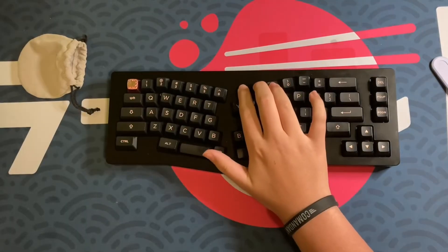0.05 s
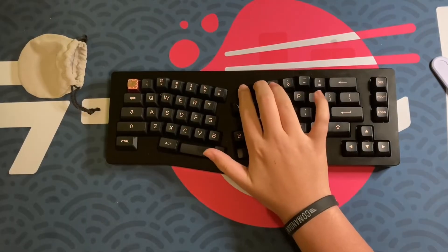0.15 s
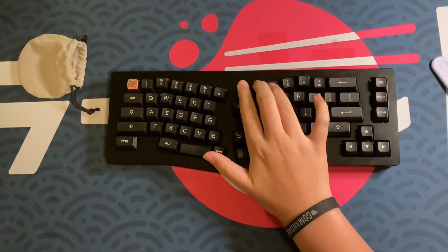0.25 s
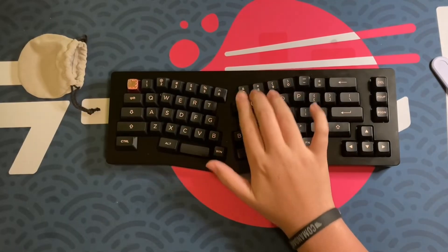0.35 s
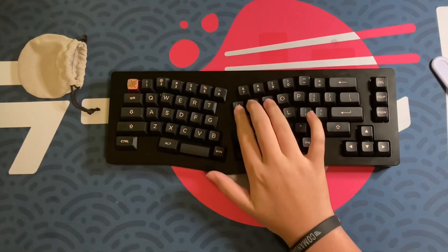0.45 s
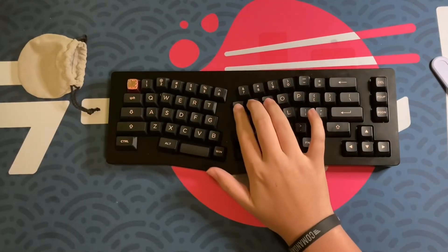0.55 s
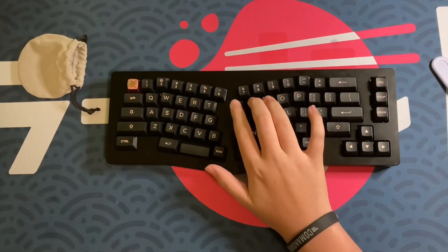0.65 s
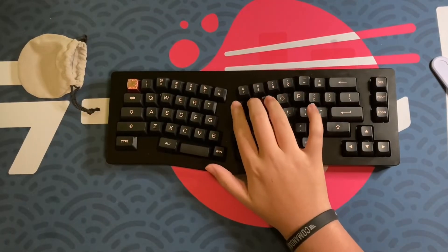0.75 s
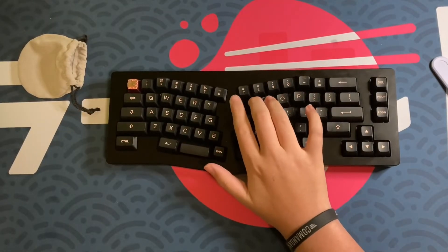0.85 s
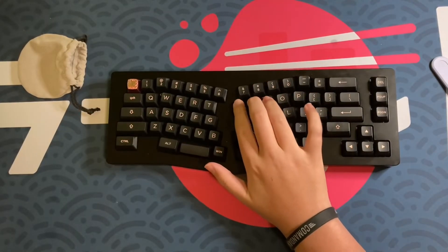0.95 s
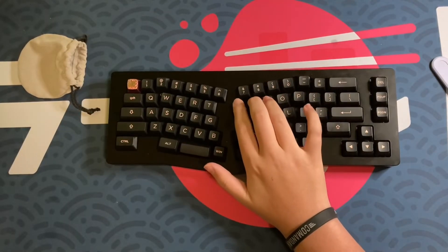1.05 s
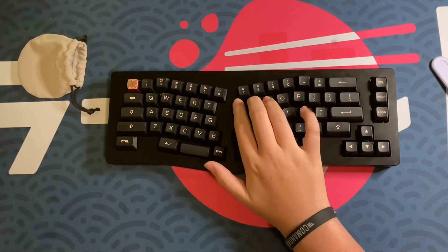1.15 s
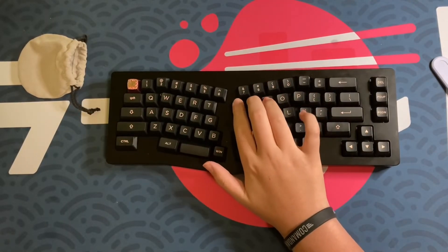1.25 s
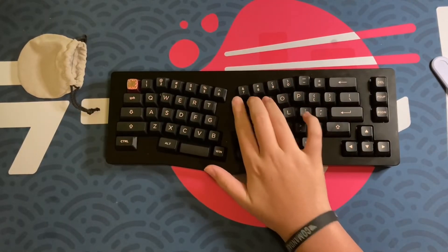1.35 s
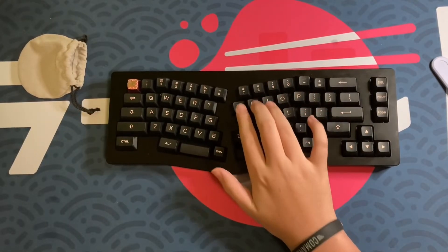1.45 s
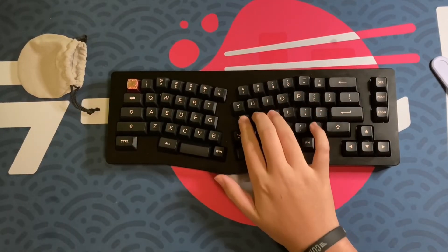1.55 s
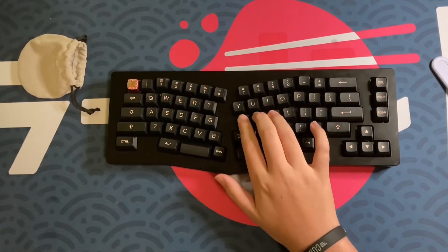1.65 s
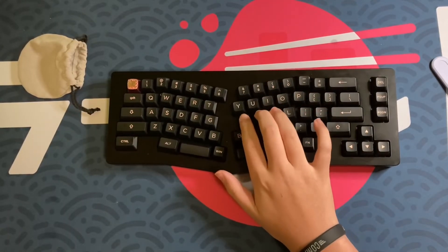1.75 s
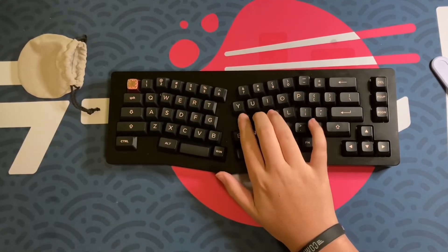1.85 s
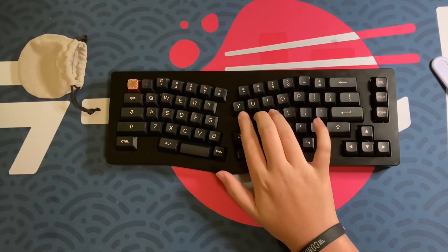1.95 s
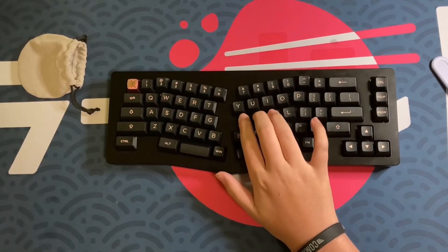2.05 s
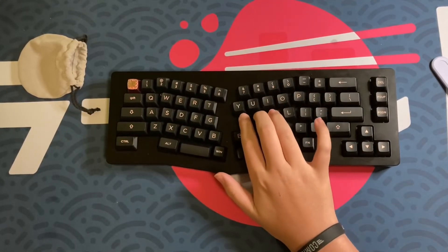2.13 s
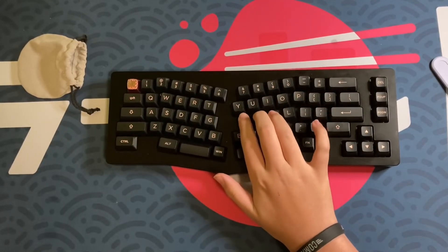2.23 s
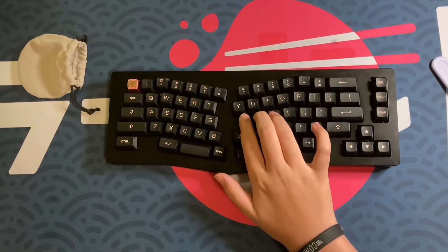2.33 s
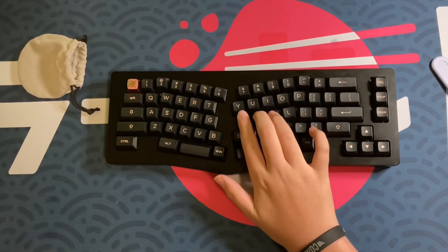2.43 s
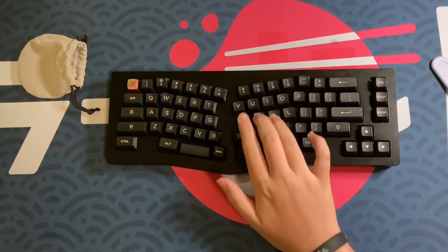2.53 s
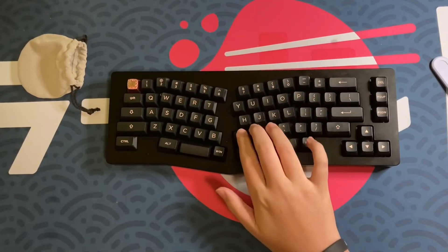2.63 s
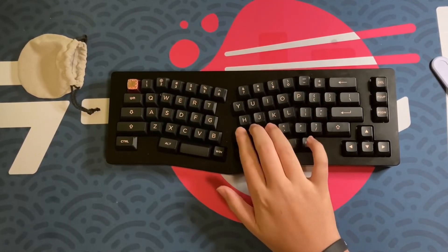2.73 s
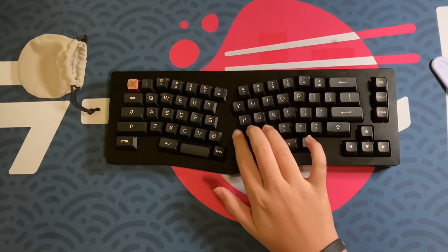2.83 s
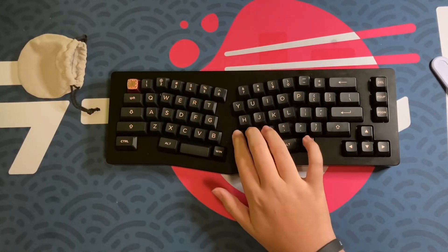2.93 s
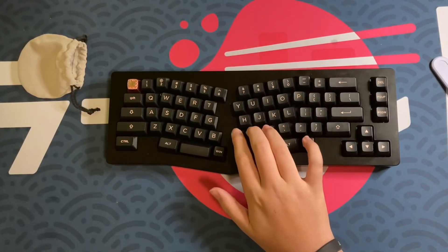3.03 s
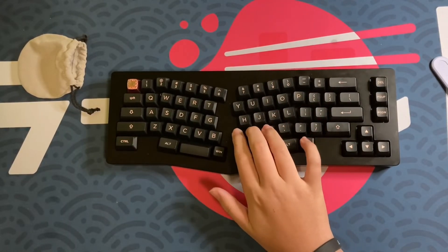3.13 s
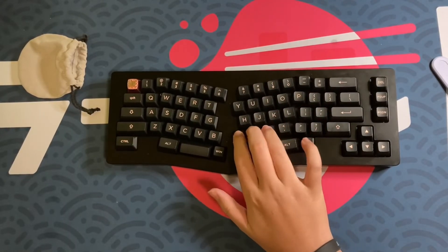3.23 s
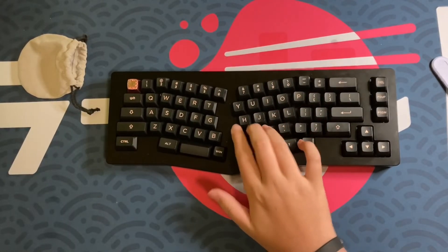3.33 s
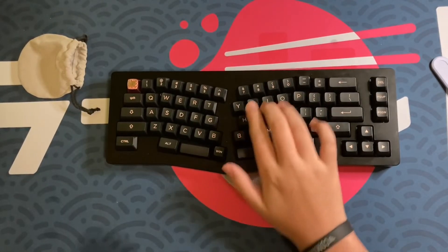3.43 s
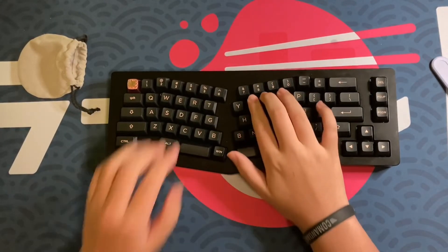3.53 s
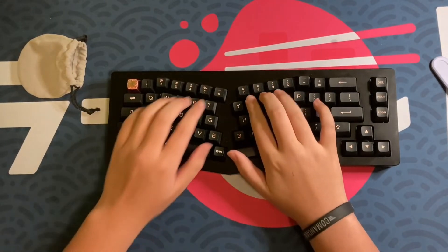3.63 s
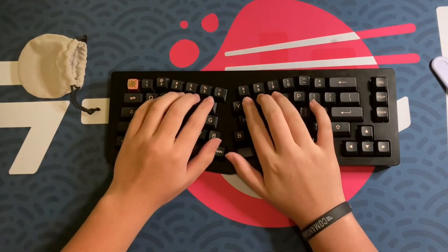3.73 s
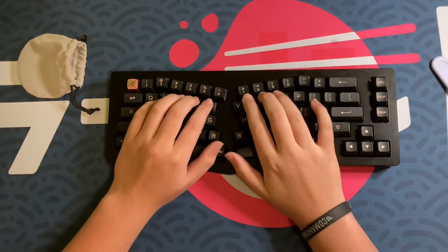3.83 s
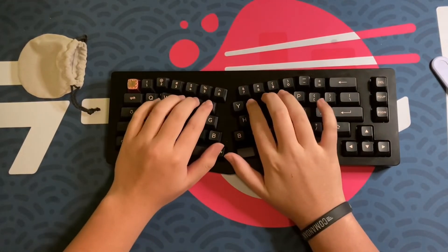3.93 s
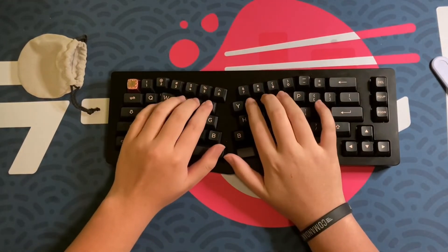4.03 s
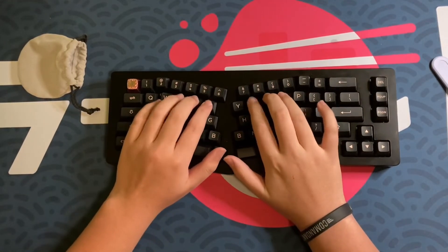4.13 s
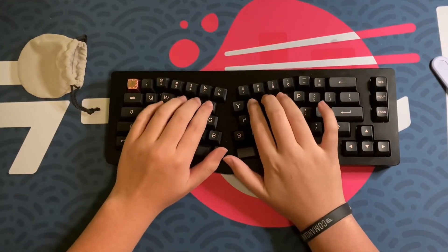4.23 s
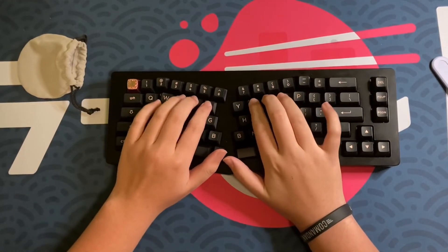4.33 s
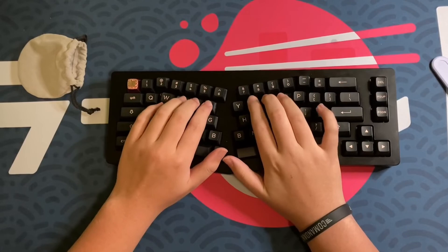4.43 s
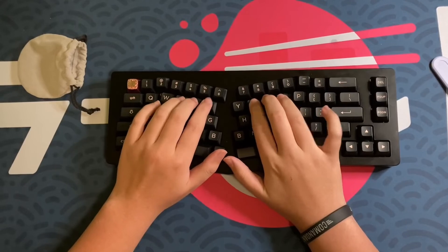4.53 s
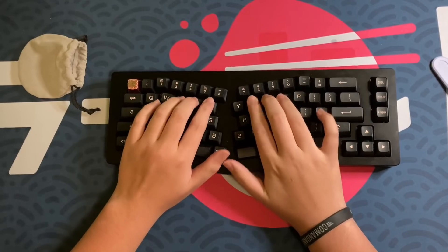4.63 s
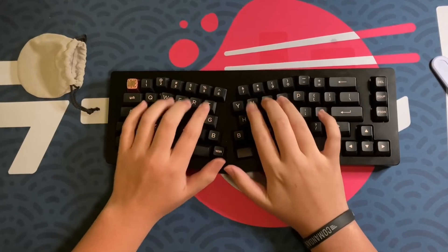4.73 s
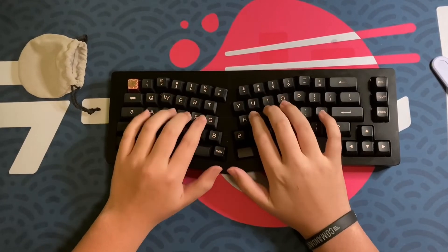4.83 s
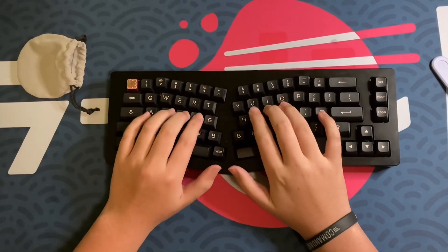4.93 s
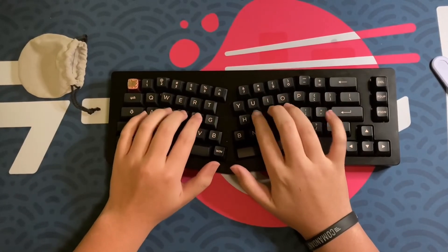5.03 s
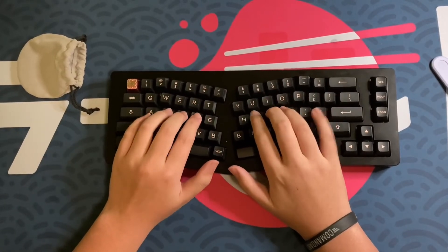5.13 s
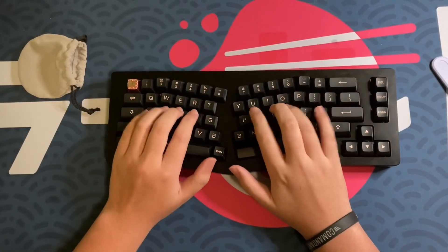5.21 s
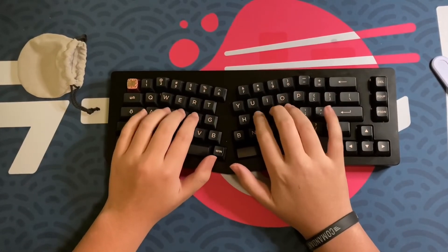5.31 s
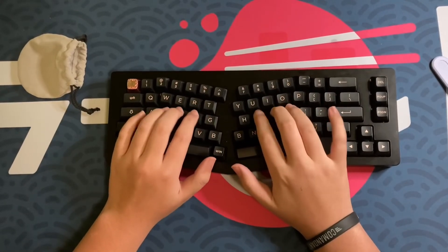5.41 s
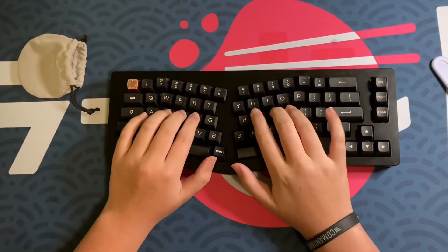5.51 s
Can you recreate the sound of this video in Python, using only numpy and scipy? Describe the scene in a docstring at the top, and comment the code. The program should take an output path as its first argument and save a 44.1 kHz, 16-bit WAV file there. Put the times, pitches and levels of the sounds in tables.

```python
"""Fast typing on a heavy mechanical keyboard on a desk mat, in short bursts with pauses.
Each press or release is a hard plastic contact: shaped noise with a tick, a keycap clack, a plate thock and chatter.
Case and desk ring as fading sines, near surfaces return delayed copies, and a small room answers as fading noise.
Sliding skin is a grainy hiss and nudges a few keycaps; low rumble and a faint rush of air lie underneath.
A stereo microphone stands close by."""
import sys
import numpy as np
from scipy import signal
from scipy.fft import rfft, irfft, next_fast_len
from scipy.io import wavfile
from scipy.ndimage import uniform_filter1d, map_coordinates

SR = 44100
rng = np.random.default_rng(int(sys.argv[2]) if len(sys.argv) > 2 else 0)


def int16_out(signal):
    """Quantize to a 16-bit WAV file."""
    q = np.round(np.clip(np.atleast_2d(signal).T, -1, 1) * 32767)
    wavfile.write(sys.argv[1], SR, q.astype(np.int16))


N = 245627  # samples in the scene

# Key contacts, presses and releases alike: [t/s, clack energy level/dB, extra tick level/dB]
KEY_CONTACTS = [(0.0001, -18, 3), (0.0732, -26, 3.0), (0.0809, -26.5, 7), (0.1315, -14.0, -1),
                (0.1752, -15.0, 4.5), (0.216, -20, 4.5), (0.2657, -21.5, 11), (0.698, -14.5, -7),
                (0.7305, -18, -5), (0.7697, -11, -2), (0.7848, -14.5, 7), (0.8499, -14, 3.5),
                (0.91, -13.5, -4), (0.957, -17.5, -3.0), (0.9749, -12.5, 1.5), (1.0001, -14, 6),
                (1.0931, -11, -1.5), (1.1311, -9, 3), (1.17, -20.5, -2.0), (1.2111, -14, 7),
                (1.2608, -10.5, -1.5), (1.2803, -12, -6), (1.284, -7.5, 4), (1.3377, -15.5, 7.5),
                (1.3826, -15, 8.5), (1.79, -13.5, -1.5), (1.8249, -12.5, -3.5), (1.8606, -17, 8.5),
                (1.923, -18, 5), (2.006, -22, -6), (2.0325, -17, -4), (2.0469, -25, 6.0),
                (2.107, -20.0, 2.5), (2.2087, -21.5, -10), (2.2131, -18, 2.5), (2.2827, -20.0, 3.5),
                (2.3311, -6.5, -1.0), (2.3726, -19, -10.0), (2.383, -12.5, 7), (2.4263, -15, 8),
                (2.4705, -18.5, 10.0), (2.4853, -15.5, 9.5), (2.6893, -25, -24), (2.8458, -14, -5),
                (2.9033, -14.5, 3), (2.924, -15, 4), (2.9603, -18.5, -2), (3.0164, -17.5, -2),
                (3.0985, -6.5, 4.0), (3.1776, -15, 10.5), (3.2248, -9.5, 5), (3.2593, -9, 6.5),
                (3.319, -11.5, 9), (3.3304, -6.5, 13), (3.3499, -9, 3.5), (3.7313, -28.5, -27),
                (3.9196, -5.5, 0), (3.9409, -8.0, 0), (3.9667, -11, -3), (3.9852, -11, -2),
                (3.9994, -11.0, 3), (4.0392, -11.5, 5), (4.0934, -16.5, 6), (4.1025, -19.5, 6),
                (4.1459, -5.5, 1.5), (4.1602, -9.5, -2), (4.1817, -8, 0), (4.192, -10, -15),
                (4.2131, -11, 4), (4.2233, -9.5, 2.5), (4.248, -11.5, 2.0), (4.285, -17, -3),
                (4.3, -16, -6), (4.3339, -8, -1), (4.3616, -15, 2.0), (4.3824, -2, -8), (4.393, -7, 5.5),
                (4.4204, -13, 3), (4.4652, -18, -2.0), (4.4712, -18, 5), (4.5086, -10, -5),
                (4.549, -5.5, -1), (4.5562, -7, 5.5), (4.579, -12.5, -2.0), (4.6162, -16, 5.5),
                (4.6355, -14, 0), (4.6495, -12, -8.5), (5.038, -2.5, 3.5), (5.0541, -10.5, -7),
                (5.0615, -18, 15.5), (5.1292, -13, 8.5), (5.1354, -11.5, 9.5), (5.1721, -17.5, 12.5),
                (5.1853, -16.5, 7), (5.2502, -9, 3), (5.2564, -12.5, -2), (5.274, -11, 2),
                (5.2954, -11.0, 0), (5.3345, -8, 10.0), (5.358, -8.5, 2.0), (5.4283, -9.0, 6),
                (5.4552, -14.5, -1.0), (5.466, -10.0, 1), (5.4843, -15.5, 12.5), (5.4918, -13, 10),
                (5.5463, -8, 3.0), (5.5533, -19.5, 10.5)]
# Bursts of typing, each on its own patch of keys:
# [start t/s, keycap pitch f/Hz, keycap resonance level/dB, extra thock level/dB]
TYPING_BURSTS = [(0, 2070, -0.5, 2), (.5, 2110, 6, 2), (1.6, 2360, 1, 4.5), (2.6, 1680, 8, 3.5),
                 (3.8, 2060, 5.5, 0.4), (4.9, 2700, 5.5, 4)]
# Colour of a contact heard through cap, plate and case: [f/Hz, relative level/dB]
BOARD_COLOUR = [(80, -35), (280, -26), (480, -15.5), (720, -12.5), (880, -10), (1100, -1), (1370, -10.5),
                (1700, 1), (2300, -2), (2850, -5.5), (3500, -15.5), (5000, -18), (7000, -28),
                (11500, -26.5), (15500, -39.5)]
# Ringing tones of case and desk: [f/Hz, relative level/dB]
CASE_MODES = [(615, 10), (820, -19), (1045, -36), (1152, -2), (1245, 23), (1397, 17.5), (1612, 17.5),
              (1762, -29), (1882, -26), (2021, -17), (2120, 12), (2241, 28), (2607, -27), (2736, -34),
              (2829, -23), (2993, -20), (3430, -1)]
# Hard surfaces nearby: [delay to the left t/s, delay to the right t/s, level/dB]
NEAR_ECHOES = [(.00175, 0.001318, -9), (.0083, .0085, -16)]
# Time the room's answer takes to fall by 60 dB: [f/Hz, t/s]
ROOM_DECAY = [(300, 0.26), (800, 0.25), (2100, 0.24), (5500, 0.14), (12000, 0.24)]
# Colour of the room's answer: [f/Hz, relative level/dB]
WALL_COLOUR = [(200, 3), (700, 2.5), (2000, 0.5), (4500, 5.5), (6000, -5), (9000, 2.5), (11000, -16.5),
               (15000, -21)]
# How far the left capsule leads for sound from the keys: [f/Hz, phase/radians]
LEFT_LEAD = [(0, 0), (1100, 0), (2200, .45), (3200, .6), (5200, 3.1), (8000, 6), (11700, 9.4),
             (16000, 13.3)]
# Slides of a hand over mat and caps: [start t/s, length t/s, level/dB before fading and grain]
HAND_SLIDES = [(3.508, 0.13, -62.5), (3.674, 0.016, -58.5), (4.67, 0.14, -65.5)]
# Colour of the hiss of sliding skin: [f/Hz, relative level/dB per Hz]
SKIN_COLOUR = [(300, -6), (1200, 1), (2400, -1), (4000, -5), (6000, -9), (9000, -9), (11000, -16),
               (15000, -9)]
# Colour of the rush of air in the room: [f/Hz, relative level/dB per Hz]
AIR_COLOUR = [(200, -2), (450, -4), (750, 0), (1100, 0), (1600, -3), (2300, -9), (3400, -7), (5000, -20),
              (7000, -27), (9000, -30), (10800, -41), (13000, -34), (16000, -38)]
# Colour of the rumble of room and desk: [f/Hz, relative level/dB per Hz]
RUMBLE_COLOUR = [(12, -36), (25, -21), (45, 6), (62, 6), (88, 2.5), (140, 4.5), (172, -19.5), (200, -0.5),
                 (250, -11.5), (500, -43.5)]
# Rumble over time, before its sway and left-right balance: [t/s, level/dB]
RUMBLE_LEVEL = [(0, -59.5), (.5, -67.5), (5, -66.5), (5.57, -64)]
# How alike left and right are in the room tone: [f/Hz, likeness from 0 to 1]
ROOM_LIKENESS = [(40, 0.58), (120, 0.88), (300, 0.7), (800, 0), (3000, 0)]

AIR_DB = -66.5
TOP_HZ = 15800  # nothing passes from here up
CONTACT_SIZE = 2048  # samples behind one contact's spectrum; the first half is heard
CASE_T60_S = 0.16  # time for case and desk to fall by 60 dB
CAP_SCATTER = 0.12  # random spread of keycap pitch, as a share
USUAL_KEY_DB = -11  # an ordinary stroke
SOFT_THOCK = 0.46  # a softer stroke is duller: dB of thock gained per dB of clack lost
TICK_THOCK = 0.09  # a key that bottoms out squarely ticks and thocks together (dB per dB)
SEAT_S, SEAT_PER_DB = 0.00024, 0.06  # seating time of an ordinary stroke; share it shortens per dB of force
SLIDE_ATTACK_S, SLIDE_RELEASE_S = 0.006, 0.025  # time constants of the rise and the fade
SLIDE_SAG_DB_PER_S = 25  # the hand slows as it slides
GRAZE_DB = -37.5  # keycaps nudged by sliding fingers


def amp(db):
    """Turn decibels into gain."""
    return 10 ** (np.asarray(db) / 20)


def unit(x):
    """Scale to an average strength (rms) of 1."""
    return x / np.sqrt(np.mean(x ** 2) + 1e-20)


def along(points, hz):
    """Read a table of (f/Hz, value) at any frequency, on a log axis."""
    point_hz, values = np.transpose(points)
    return np.interp(np.log(hz + 1), np.log(point_hz + 1), values)


def bump(hz, centre_hz, width_hz):
    """A resonance peak of height 1."""
    return 1 / (1 + (2 * (hz - centre_hz) / width_hz) ** 2)


def causal(db):
    """A filter with these gains that answers as promptly as possible (minimum phase)."""
    cepstrum = irfft(np.log(amp(db)))
    half = len(cepstrum) // 2
    # folding the second half onto the first leaves nothing ahead of time zero
    cepstrum[1:half] *= 2
    cepstrum[half + 1:] = 0
    return np.exp(rfft(cepstrum))


def filtered(x, response):
    """Filter x by multiplying its spectrum with a response of frequency."""
    size = 2 * next_fast_len((N + SR // 2) // 2)
    spectrum = rfft(x, size) * response(np.fft.rfftfreq(size, 1 / SR))
    return irfft(spectrum, size)[..., :N]


def wobble(rate):
    """A smooth random curve through rate random points a second."""
    knots = rng.standard_normal(int(N * rate / SR) + 4)
    return map_coordinates(knots, [np.arange(N) * rate / SR])


def add(track, s, sound):
    """Mix a sound into a track at s seconds."""
    start = int(np.clip(round(s * SR), 0, N - 1))
    track[..., start:start + sound.shape[-1]] += sound[..., :N - start]


def room_noise(spectrum):
    """Coloured stereo noise of rms 1; shared and opposite parts set how alike the two sides are."""
    def colour(hz):
        turn = np.arccos(np.clip(along(ROOM_LIKENESS, hz), -1, 1)) / 2
        return amp(along(spectrum, hz)) * np.array([np.cos(turn), np.sin(turn)])
    mid, side = filtered(rng.standard_normal((2, N)), colour)
    return unit(np.array([mid + side, mid - side]))


def room_tone(sway_db=1, left_db=1.5):
    """An uneven rumble, stronger on the left, under a faint steady rush of air."""
    t = np.arange(N) / SR
    rumble_db = np.interp(t, *np.transpose(RUMBLE_LEVEL)) + sway_db * wobble(5.14)
    rumble = room_noise(RUMBLE_COLOUR) * amp(rumble_db + np.array([[left_db], [-left_db]]))
    air = room_noise(AIR_COLOUR) * amp(AIR_DB)
    return rumble + air


def brushing(grain_db=1.0, uneven_db=4.0):
    """Skin slides over cloth and keycaps with an uneven, grainy hiss that swells, sags and fades."""
    t, level = np.arange(N) / SR, np.zeros(N)
    for start, length, db in HAND_SLIDES:
        age = np.maximum(t - start, 0)
        rise = 1 - np.exp(-age / SLIDE_ATTACK_S)
        fade = np.exp(-np.maximum(age - length, 0) / SLIDE_RELEASE_S)
        level = level + rise * fade * amp(db - SLIDE_SAG_DB_PER_S * age)
    hiss = unit(filtered(rng.standard_normal((2, N)), lambda hz: amp(along(SKIN_COLOUR, hz))))
    return hiss * level * amp(grain_db * wobble(91) + uneven_db * wobble(13))


def grazes(thock_db=9, tick_db=0, cap_hz=2000, count=2):
    """Sliding fingers nudge a few keycaps, in the later part of each slide."""
    track = np.zeros(N)
    for start, length, _ in HAND_SLIDES:
        for place in rng.uniform(0.57, 0.96, size=count):
            add(track, start + place * length, amp(GRAZE_DB) * contact(thock_db, tick_db, cap_hz))
    return track


def room_tail(build_s=0.0033):
    """A fresh stereo tail of the small room: noise in which each frequency dies at its own speed."""
    hz, t, bands = signal.stft(rng.standard_normal((2, SR // 4)), SR, nperseg=128)
    decay_db = -60 * t / along(ROOM_DECAY, hz)[:, None]
    bands = bands * amp(along(WALL_COLOUR, hz)[:, None] + decay_db)
    tail = signal.istft(bands, SR, nperseg=128)[1]
    age = np.arange(tail.shape[1]) / SR
    tail = tail * (1 - np.exp(-(age / build_s) ** 2))
    return tail / np.linalg.norm(tail[0])


def case_ring(spread_db=2):
    """Case and desk ring in fading pure tones, with new strengths and phases for each struck place."""
    t = np.arange(SR // 5) / SR
    hz, db = np.transpose(CASE_MODES)[:, :, None]
    modes = amp(db - 60 * t / CASE_T60_S) * np.exp(2j * np.pi * hz * t)
    strength = amp(spread_db * rng.standard_normal(len(CASE_MODES)))
    phase = np.exp(2j * np.pi * rng.random((2, len(CASE_MODES))))  # separate for left and right
    ring = ((strength * phase) @ modes).real
    onset = 1 - np.exp(-t / 0.00037)
    return ring * onset / np.linalg.norm(modes)


def to_capsules(direct, right_db=2):
    """The clack reaches the left first but is stronger on the right; near surfaces return dull copies."""
    def paths(hz):
        dull = 1 / (1 + (hz / 4200) ** 4)
        bounces = 0
        for left_s, right_s, db in NEAR_ECHOES:
            delay = np.exp(-2j * np.pi * hz * np.array([[left_s], [right_s]]))
            bounces = bounces + amp(db) * delay * dull
        lag = np.interp(hz, *np.transpose(LEFT_LEAD)) * np.array([[0], [1]])
        balance = amp(np.array([[-right_db], [right_db]]) * bump(hz, 2400, 2400))
        return np.exp(-1j * lag) * (1 + bounces) * balance
    return filtered(direct, paths)


def contact(thock_db, tick_db, cap_hz, cap_db=4, cap_width_hz=600, seat=0.000268,
            chatter_db=-10, chatter_t60=0.014, spread_db=2.5):
    """A brief plastic contact force, coloured by cap, plate and case; scaled to energy 1 in the clack band."""
    hz, t = np.fft.rfftfreq(CONTACT_SIZE, 1 / SR), np.arange(CONTACT_SIZE) / SR
    # the thock lies in the low range, the tick in the high range
    low = 1 / (1 + (hz / 1400) ** 6)
    high = 1 / (1 + (4500 / (hz + 1)) ** 6)
    # a random curve makes each contact slightly different
    own = np.interp(hz, np.linspace(0, SR / 2, num=64), rng.standard_normal(64))
    colour = along(BOARD_COLOUR, hz) + thock_db * low + tick_db * high
    colour = colour + cap_db * bump(hz, cap_hz, cap_width_hz) + spread_db * own
    # the stem seats itself quickly; then the loose cap chatters, softer and duller
    seating = unit(rfft(rng.standard_normal(CONTACT_SIZE) * t * np.exp(-t / seat)))
    # cubing the noise turns it into scattered spikes
    spikes = rng.standard_normal(CONTACT_SIZE) ** 3
    chatter = unit(rfft(spikes * amp(-60 * t / chatter_t60) * (t > 0.0015)))
    force = seating + amp(chatter_db - 4.1 * high) * chatter
    # so brief a force feeds all bands alike: even it out broadly, keeping its fine random ripple
    force = force / np.sqrt(np.abs(uniform_filter1d(np.abs(force) ** 2, size=30)))
    spectrum = force * causal(colour)
    clack_band = (hz > 1400) & (hz < 4000)
    energy = 2 * np.sum(np.abs(spectrum[clack_band]) ** 2) / CONTACT_SIZE
    return irfft(spectrum)[:CONTACT_SIZE // 2] / np.sqrt(energy)


def typing(room_db=-8, case_db=-7, landing_db=-20, landing_tick_db=-8, shift_db=-14, touch_follows=0.75):
    """Force and place colour each key contact, with lighter touches around it; gives direct sound and ringing."""
    direct, ringing = np.zeros(N), np.zeros((2, N))
    for s, db, tick_db in KEY_CONTACTS:
        burst_index = sum(s >= burst[0] for burst in TYPING_BURSTS[1:])
        _, patch_hz, cap_db, patch_db = TYPING_BURSTS[burst_index]
        cap_hz = patch_hz * np.exp(CAP_SCATTER * rng.standard_normal())
        force_db = db - USUAL_KEY_DB
        thock_db = patch_db - SOFT_THOCK * force_db + TICK_THOCK * tick_db
        seat = SEAT_S * np.exp(-SEAT_PER_DB * force_db)
        hit = amp(db) * contact(thock_db, tick_db, cap_hz, cap_db, seat=seat)
        add(direct, s, hit)
        add(ringing, s, amp(room_db) * signal.fftconvolve(hit[None], room_tail(), axes=1))
        add(ringing, s, amp(db + case_db) * case_ring())
        # a soft fingertip lands just before, and the cap shifts on its stem afterwards
        touch_db = USUAL_KEY_DB + touch_follows * force_db + rng.normal(0, 1.1, size=2)
        landing, shift = amp(touch_db + np.array([landing_db, shift_db]))
        landing_s = s - rng.uniform(0.0031, 0.015)
        add(direct, landing_s, landing * contact(patch_db, landing_tick_db, cap_hz, cap_db))
        shift_s = s + rng.uniform(0.004, 0.02)
        add(direct, shift_s, shift * contact(patch_db, 0, cap_hz, cap_db))
    return direct, ringing


def scene():
    """Add up the keys, their ringing, the hands and the room."""
    direct, ringing = typing()
    keys = to_capsules(direct + grazes())
    ringing = ringing * amp([[-0.6], [0.6]])  # slightly stronger on the right
    return keys + ringing + brushing() + room_tone()


def record(dry, presence_db=13, presence_hz=10800, presence_width_hz=1500):
    """The capsules have a sharp treble resonance; nothing passes above the band limit."""
    def capsule(hz):
        resonance = causal(presence_db * bump(hz, presence_hz, presence_width_hz))
        return resonance * (hz < TOP_HZ)
    return filtered(dry, capsule)


dry = scene()
out = record(dry)
int16_out(out)
```